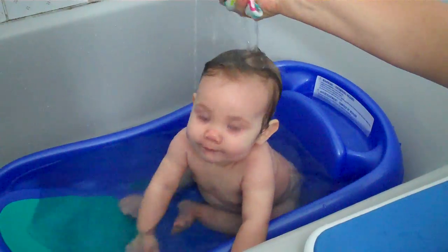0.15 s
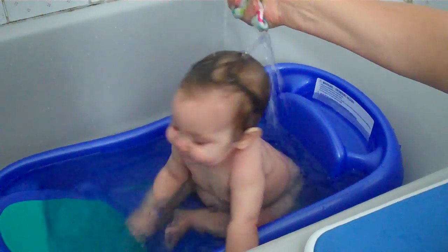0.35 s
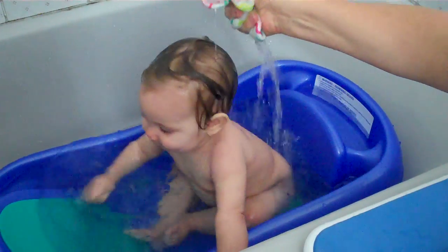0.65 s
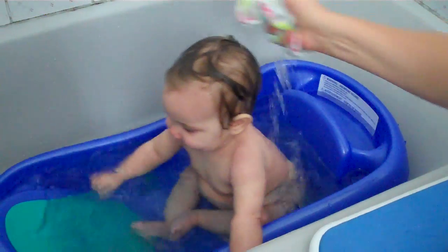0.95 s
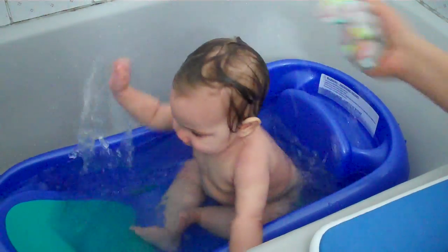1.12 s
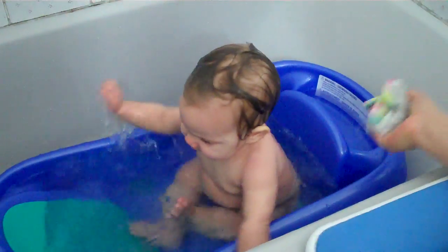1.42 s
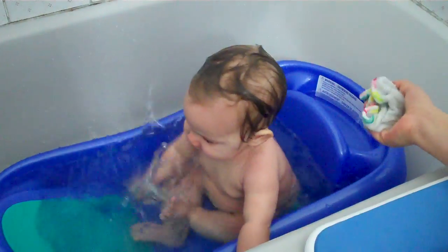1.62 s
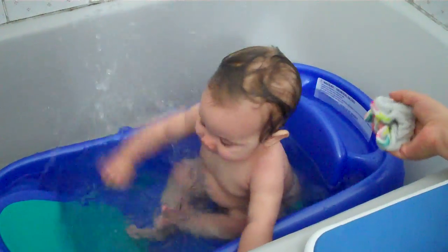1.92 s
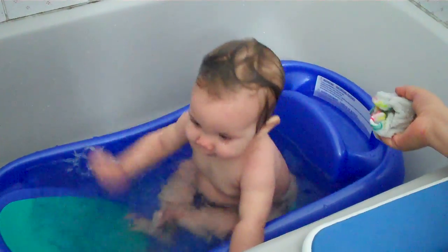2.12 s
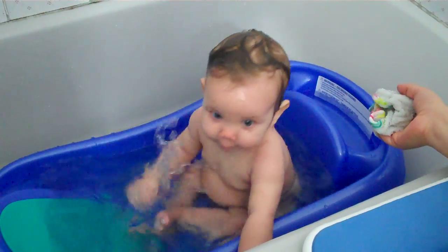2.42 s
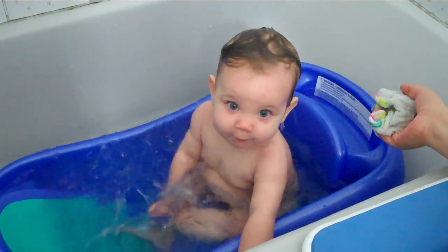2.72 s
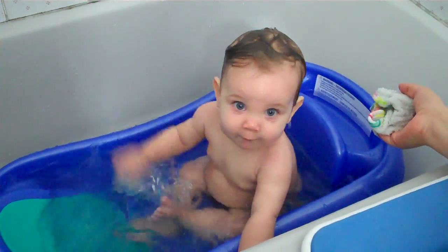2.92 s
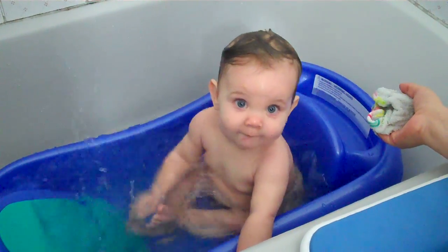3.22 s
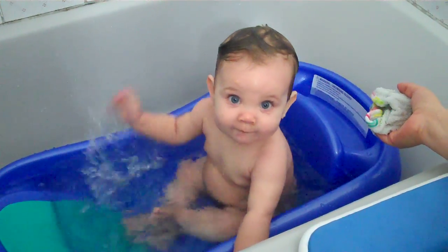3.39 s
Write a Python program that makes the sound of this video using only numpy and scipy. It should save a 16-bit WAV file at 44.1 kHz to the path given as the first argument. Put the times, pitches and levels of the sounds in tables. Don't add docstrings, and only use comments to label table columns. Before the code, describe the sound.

Water splashes in a baby tub: a quiet slosh and faint drips first, then repeated small hand slaps with bubbly bloops and pattering drops, heard about a metre away in a hard-walled bathroom.

```python
import sys
import numpy as np
from scipy import signal
from scipy.fft import rfft, irfft, next_fast_len
from scipy.io import wavfile

SR = 44100
rng = np.random.default_rng(int(sys.argv[2]) if len(sys.argv) > 2 else 0)


def bounce(signal):
    frames = np.transpose(np.atleast_2d(signal))
    limited = np.clip(frames, -1, 1)
    pcm = np.round(limited * 32767).astype(np.int16)
    wavfile.write(sys.argv[1], SR, pcm)


def nominal_scale(level):
    x = np.asarray(level, float) / 20
    return 10 ** x


N = 156555
CONTROL_STEP = 40
DROP_RISE = 0.0046


def rms_one(x):
    return x / np.sqrt(np.mean(x ** 2) + 1e-20)


def at_hz(points, hz):
    table_hz, value = np.transpose(points)
    return np.interp(np.log(hz + 1), np.log(table_hz + 1), value)


def over_time(s, value):
    return np.interp(np.arange(N) / SR, s, value)


def band(x, low_hz, high_hz):
    return signal.sosfilt(signal.butter(2, [low_hz, high_hz], "band", fs=SR, output="sos"), x)


def highpass(x, order, hz):
    return signal.sosfilt(signal.butter(order, hz, "high", fs=SR, output="sos"), x)


def drift(rate_hz):
    pole = np.exp(-2 * np.pi * rate_hz * CONTROL_STEP / SR)
    noise = rng.standard_normal(N // CONTROL_STEP + 2002)
    slow = signal.lfilter([1], [1, -2 * pole, pole * pole], noise)[2000:]
    return np.interp(np.arange(N) / CONTROL_STEP, np.arange(len(slow)), rms_one(slow))


# (frequency [Hz], correlation [0-1])
PORT_LIKENESS = [(30, 0.64), (400, 0.95), (3100, 0.66), (14900, 0.26)]


def banded_noise(white, spectrum, patchy_db, rate_hz, swell=None):
    out = 0
    edges_hz = 20 * 2 ** np.arange(0, 10, .5)
    shared = drift(rate_hz)
    for k, (low, high) in enumerate(zip(edges_hz, edges_hz[1:])):
        hz = np.sqrt(low * high)
        gain = nominal_scale(at_hz(spectrum, hz) + patchy_db * (.5 * shared + drift(rate_hz)))
        if swell:
            gain = gain * swell(hz)
        source = np.roll(white[k % 2], 997 * (k // 2), axis=1)
        mid, side = band(source, low, high)
        alike = np.clip(at_hz(PORT_LIKENESS, hz), 0, 1)
        out = out + gain * (np.sqrt(1 + alike) * mid + np.sqrt(1 - alike) * side * [[1], [-1]])
    return out


def add_bubble(out, s, db, hz, cycles, rise):
    cycles = max(cycles, 2)
    turns = np.arange(int(cycles / hz * SR)) * hz / SR
    onset_cycles = 1.1
    shape = (1 - np.exp(-turns / onset_cycles)) * nominal_scale(db - 60 * turns / cycles)
    i = int(s * SR)
    out[i:i + len(turns)] += shape * np.sin(2 * np.pi * (turns + .5 * rise * turns ** 2))


# (frequency [Hz], level [dB])
ROOM_SPECTRUM = [(12, -12), (30, 2), (90, -14), (140, -5), (300, -15), (1900, -8), (3200, -16.5),
                 (9000, -14), (14000, -54)]
# (time [s], level [dB])
ROOM_GAIN = [
    (0, 1),
    (1.1, 2.5),
    (1.6, 3.5),
    (2.3, 4.5),
    (2.65, -5.5),
    (3.5, 0.5),
]


def room_quiet(white):
    noise = banded_noise(white, ROOM_SPECTRUM, patchy_db=2.0, rate_hz=13.0)
    return nominal_scale(-56.5 + over_time(*np.transpose(ROOM_GAIN))) * rms_one(noise)


# (frequency [Hz], density [dB per Hz])
SLOSH_SPECTRUM = [(60, -9), (150, -8.5), (330, 3), (700, -5), (1600, -15)]
# (time [s], churn level [dB], depth of stirring [dB])
CHURN = [(0, -52.5, -0.5), (.2, -55.5, -13), (.27, -42, -5.5), (.5, -50.5, -4), (.62, -51, 14.5),
         (.85, -39, 7), (1.1, -42, -4.5), (1.298, -47.5, 0.5), (1.419, -41.5, 6.5), (1.601, -54, -2.5),
         (1.803, -28, 0), (1.9, -43.5, -2), (2.134, -31, 6.5), (2.24, -43, -3), (2.531, -46.5, -4.5),
         (2.68, -41.5, -6), (3., -47.5, -3.5), (3.38, -51, -5.5)]


def slosh(white):
    s, churn_db, depth_db = np.transpose(CHURN)
    noise = banded_noise(white, SLOSH_SPECTRUM, patchy_db=2.5, rate_hz=5.3)
    return nominal_scale(-43 + over_time(s, depth_db)) * noise


# (time [s], peak level [dB], ring [Hz], spray thrown [dB])
TICKS = [(0.0164, -32, 3030, -14.5), (0.1227, -30, 2140, -15), (0.1314, -31, 4200, -27),
         (0.172, -28, 5080, -20), (0.2433, -29.5, 3100, -20), (0.3614, -31, 5840, -23),
         (0.4134, -29.5, 9200, -14), (0.5262, -24, 3080, -12.5), (0.6567, -5.5, 4360, -17.5),
         (0.6856, -15, 2700, -10), (0.7844, -15, 3800, -14), (0.8064, -12.5, 5050, -17.5),
         (1.0014, -20, 3390, -22), (1.0303, -11.5, 5200, -31), (1.1172, -21.5, 2330, -11.5),
         (1.1483, -18, 6900, -27), (1.2278, -11.5, 3010, -27), (1.2714, -18, 3770, -17),
         (1.3114, -16, 2600, -20), (1.464, -18.5, 2330, -18), (1.5574, -25, 8360, -14.5),
         (1.714, -23, 7200, -22), (1.77, -17, 2230, -12), (1.9061, -21, 5500, -29), (1.951, -23, 6290, -25),
         (2.0941, -31, 3290, -29), (2.1303, -9, 5050, -18.5), (2.1644, -20, 2320, -27),
         (2.6597, -23, 2470, -12), (2.7185, -15.5, 2370, -19), (2.9012, -14, 6300, -22.5),
         (3.02, -22.5, 5150, -15.5), (3.0586, -19, 2920, -18), (3.1193, -19, 3520, -9),
         (3.1725, -14.5, 3400, -27), (3.1894, -30, 4050, -25), (3.219, -8.5, 2700, -8),
         (3.3832, -23, 2420, -41.5), (3.4146, -18.5, 3030, -20.5), (3.4264, -24, 5200, -27),
         (3.459, -34, 2340, -10), (3.489, -33, 7340, -15), (3.5116, -29, 3110, -39.5),
         (3.5409, -28.5, 2000, -7)]
TICK_S, TICK_DB, TICK_CYCLES, TICK_RING_DB = 0.00085, -16, 31, -6.5


def ticks():
    out, t = np.zeros(N + SR), np.arange(400) / SR
    for s, db, hz, thrown_db in TICKS:
        snap = rms_one(band(rng.standard_normal(len(t)), hz * .8, min(hz * 1.6, 13000)))
        i = int(s * SR)
        out[i:i + len(t)] += nominal_scale(db + TICK_DB) * snap * np.exp(-abs(t - .001) / TICK_S)
        add_bubble(out, s, db + TICK_RING_DB, hz, TICK_CYCLES, DROP_RISE)
    return out[:N]


# (time [s], peak level [dB], pitch [Hz],
# ring [cycles])
BLOOPS = [(.018, -39.5, 310, 14), (.46, -39.5, 746, 34), (.612, -36, 738, 380), (.66, -19.5, 1240, 36),
          (.674, -16.5, 1340, 30), (.724, -23.5, 735, 38), (.758, -25, 1090, 27), (.778, -19.5, 930, 24),
          (.92, -23.5, 687, 38), (1.394, -31, 1230, 48), (1.621, -20.5, 780, 11.2), (1.718, -19.5, 905, 30),
          (1.788, -18.5, 1087, 69), (1.951, -24.5, 1400, 17), (2.044, -15.5, 1120, 42),
          (2.058, -15.5, 1347, 38), (2.09, -28, 456, 17), (2.145, -24, 830, 18.5), (2.272, -34.5, 884, 42),
          (2.343, -25.5, 923, 53), (2.386, -11.5, 1460, 20.7), (2.394, -24, 170, 1.6),
          (2.572, -25.5, 982, 64), (2.576, -27.5, 487, 25), (2.603, -28.5, 523, 28),
          (2.622, -19.5, 590, 15.4), (2.64, -23.5, 577, 23), (2.658, -31, 656, 20),
          (2.697, -25.5, 1280, 30), (2.772, -16.5, 1252, 59), (3.026, -26, 592, 24),
          (3.06, -22.5, 1294, 25), (3.13, -35.5, 1086, 120), (3.226, -4.5, 1139, 23.3),
          (3.235, -25.5, 682, 25.5), (3.439, -24, 1032, 63)]
# (time [s], peak level [dB], pitch [Hz])
BLIPS = [(0.523, -29, 2550), (0.545, -11.5, 2940), (0.618, -15.5, 2650), (.646, -12.5, 2150),
         (0.972, -15, 1880), (1.117, -25, 2290), (1.174, -26.5, 2040), (1.519, -32, 2410),
         (1.766, -14.5, 2130), (1.778, -13, 1630), (1.823, -18, 3150), (2.018, -18, 2620),
         (2.172, -22.5, 1540), (2.39, -8, 2720), (2.56, -21.5, 3050), (2.593, -11.5, 2510),
         (2.6, -25, 1910), (2.627, -35, 2370), (2.651, -27, 1880), (2.683, -17.5, 1850), (2.743, -19, 2710),
         (2.874, -29.5, 1220), (3.014, -27.5, 1565), (3.146, -18, 2120), (3.154, -18.5, 2520),
         (3.162, -22, 1690), (3.228, -16.5, 1490), (3.405, -27, 2170), (3.54, -32, 2130)]
BLOOP_RISE, BLOOP_DB, BLIP_CYCLES = 0.0033, -0.5, 40.
SWARM_OCTAVES, SWARM_S, SWARM_DB = 1.5, .09, 1


def bloops():
    out = np.zeros(N + SR)
    rows = list(BLOOPS) + [(s, db, hz, BLIP_CYCLES) for s, db, hz in BLIPS]
    for s, db, hz, cycles in rows:
        add_bubble(out, s, db + BLOOP_DB, hz, cycles, BLOOP_RISE)
        for late, pitch, size in rng.random((18, 3)):
            near_db = db + SWARM_DB - 14 * late - 10 * size
            near_hz = hz * 2 ** (SWARM_OCTAVES * (pitch - .25))
            add_bubble(out, s + SWARM_S * late, near_db, near_hz, .35 * cycles, 2 * BLOOP_RISE)
    return out[:N]


# (time [s], peak level [dB], ring [Hz], spray thrown [dB])
SLAPS = [(0.0447, -29.5, 3430, -27), (0.5429, -16, 3400, -15), (0.6008, -18.5, 4900, -8),
         (0.64, -7, 3300, -14), (0.6728, -16.5, 2520, -20), (0.7602, -25.5, 5330, -7.5),
         (0.8882, -13, 8800, -14), (0.9353, -19.5, 3240, -7.5), (1.0457, -22, 4950, -41),
         (1.1481, -27.5, 6200, -1), (1.1957, -19, 3060, -35), (1.241, -17, 2530, -40),
         (1.323, -18.5, 8500, -21), (1.356, -20.5, 4000, -23), (1.374, -12.5, 7300, -11),
         (1.3936, -11.5, 2770, -15), (1.6161, -16, 5260, -11), (1.7238, -22, 6900, -13),
         (1.991, -21, 2530, -40), (2.0377, -13.5, 2960, -11), (2.253, -19, 5800, -12),
         (2.2695, -12.5, 3600, -5.5), (2.3962, -6, 6300, -14), (2.5479, -31, 3100, -5.5),
         (2.7737, -17, 4320, -8), (2.8749, -25, 3460, -7), (3.009, -33, 4560, 2),
         (3.1117, -18.5, 7400, -18.5), (3.225, -8.5, 2710, -21)]
CRACK_S, CRACK_DB, RING_CYCLES, RING_DB = 0.0015, -9, 56, -4
PUSH_DB, PUSH_HZ, PUSH_CYCLES = -26, 239, 6.


def slaps():
    out, t = np.zeros(N + SR), np.arange(600) / SR
    for s, db, hz, thrown_db in SLAPS:
        noise = rng.standard_normal(len(t))
        noise[125] += 5
        crack = rms_one(band(noise, hz * .7, min(hz * 2.2, 13000)))
        i = int((s - .002) * SR)
        out[i:i + len(t)] += nominal_scale(db + CRACK_DB) * crack * np.exp(-abs(t - .003) / CRACK_S)
        add_bubble(out, s, db + RING_DB, hz, RING_CYCLES, DROP_RISE)
        add_bubble(out, s, db + PUSH_DB, PUSH_HZ, PUSH_CYCLES, DROP_RISE)
    return out[:N]


SPRAY_RISE_S, SPRAY_T60_S, SPRAY_LEAD_S = 0.0027, 0.31, 0.0053
SPRAY_COLOUR_DB = 3.5


def vigour(hz):
    t = np.arange(0, N, CONTROL_STEP) / SR
    s, churn_db, depth_db = np.transpose(CHURN)
    start, db, ring_hz, thrown_db = np.transpose(list(SLAPS) + list(TICKS))[:, :, None]
    age = np.maximum(t - start + SPRAY_LEAD_S, 0)
    colour_db = -SPRAY_COLOUR_DB * abs(np.log2(hz / ring_hz))
    spray_db = db + thrown_db + colour_db - 60 * age / SPRAY_T60_S
    spray_power = np.sum(nominal_scale(2 * spray_db) * (1 - np.exp(-age / SPRAY_RISE_S)), axis=0)
    power = nominal_scale(2 * np.interp(t, s, churn_db)) + spray_power
    low = np.clip(np.log2(2500 / hz) / 2.5, 0, 1)
    return over_time(t, np.sqrt(power) * nominal_scale(low * np.interp(t, s, depth_db)))


# (frequency [Hz], density [dB per Hz])
SPRAY_SPECTRUM = [(410, -71), (700, -17), (1140, -9.5), (1490, -10.5), (2730, -7), (4270, -8), (8980, -8.5),
                  (13700, -42), (15000, -53)]
DROP_CYCLES, DROP_SPREAD_DB, DROP_TILT_DB = 14.3, 2.5, 4.5


def patter(count):
    out = 0
    for k in range(12):
        layer = np.zeros(N + SR)
        drops = rng.random((count, 4))[:int(count * (k + 4) / 15)]
        for when, pitch, size, ring in drops:
            hz = 400 * 1.34 ** (k + pitch)
            tilt_db = DROP_TILT_DB * np.log2(hz / 2000)
            db = at_hz(SPRAY_SPECTRUM, hz) + tilt_db - DROP_SPREAD_DB * np.log(size + 0.013)
            add_bubble(layer, when * N / SR, db, hz, DROP_CYCLES * (0.14 + 4.5 * ring), DROP_RISE)
        out = out + vigour(400 * 1.34 ** (k + .5)) * layer[:N]
    return out


def grains():
    grains_per_s, spread_db = 5000, 2.6
    born = rng.random((2, 1, N)) < grains_per_s * nominal_scale(5 * drift(40)) / SR
    size = nominal_scale(spread_db * np.minimum(rng.exponential(1, (2, 1, N)), 5))
    return rms_one(born * size * rng.standard_normal((2, 2, N)))


def fizz(white):
    source = grains() + .5 * white
    return nominal_scale(7) * banded_noise(source, SPRAY_SPECTRUM, patchy_db=3.0, rate_hz=17.5, swell=vigour)


def tub(x):
    t60_s, wall_cut_hz = 0.2, 2350
    size = next_fast_len(N + SR)
    w = 2 * np.pi * np.arange(size // 2 + 1) / size
    dull = 1 / np.sqrt(1 + (w * SR / (2 * np.pi * wall_cut_hz)) ** 2) ** 0.64
    lags = rng.uniform(.006, 0.023, (2, 8, 1)) * SR
    loop = nominal_scale(-60 * lags / SR / t60_s) * dull * np.exp(-1j * w * lags)
    return irfft(rfft(x, size) * np.sum(loop / (1 - loop), axis=1), size)[:, :N]


# (frequency [Hz], phase [rad])
PORT_LEAD = [(3400, 0), (7000, .5), (9560, 2.1), (13000, 2.4)]
# (frequency [Hz], level [dB])
PORT_TILT = [(1300, -1.3), (2400, 0), (4400, -1), (8100, -7), (13000, 3)]


def ports(pair):
    hz = np.arange(N // 2 + 1) * SR / N
    half = nominal_scale(at_hz(PORT_TILT, hz) / 2) * np.exp(.5j * at_hz(PORT_LEAD, hz))
    return irfft(rfft(pair) * np.array([half, 1 / half]), N)


def scene():
    water = slaps() + bloops() + nominal_scale(1) * patter(count=260) + ticks()
    water = highpass(water, 2, 180)
    left, right = nominal_scale(-11.5) * tub(water)
    side = highpass(left - right, 1, 3000)
    echoes = left + right + side * [[1], [-1]]
    white = rng.standard_normal((2, 2, N))
    noises = fizz(white) + slosh(white[::-1]) + room_quiet(white[:, :, ::-1])
    return ports(water + echoes + noises)


def band_limit(x):
    return signal.sosfilt(signal.butter(12, 15540, fs=SR, output="sos"), x)


def record(dry):
    soft = signal.sosfilt(signal.butter(6, 13500, fs=SR, output="sos"), dry)
    return band_limit(soft)


dry = scene()
out = record(dry)
bounce(out)
```